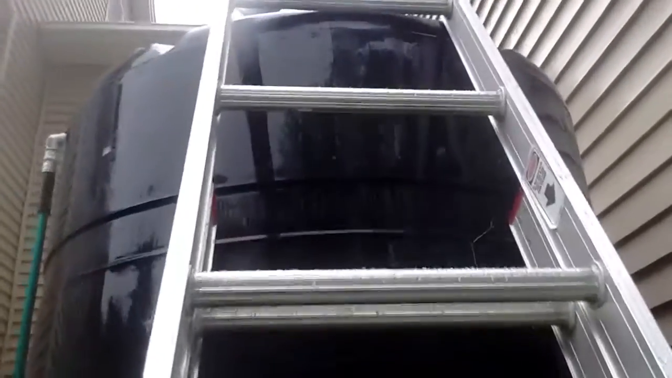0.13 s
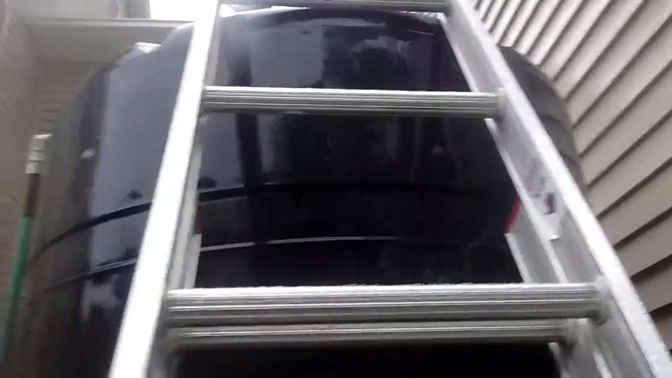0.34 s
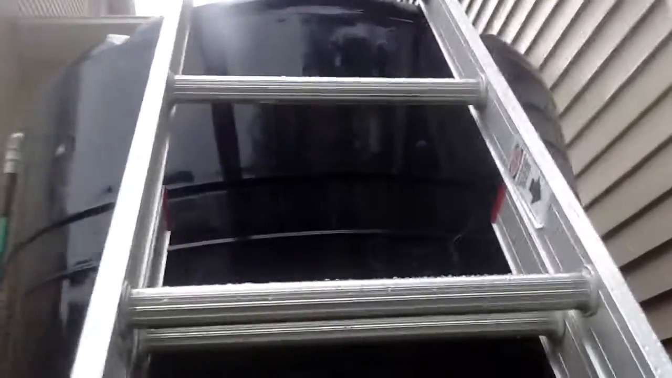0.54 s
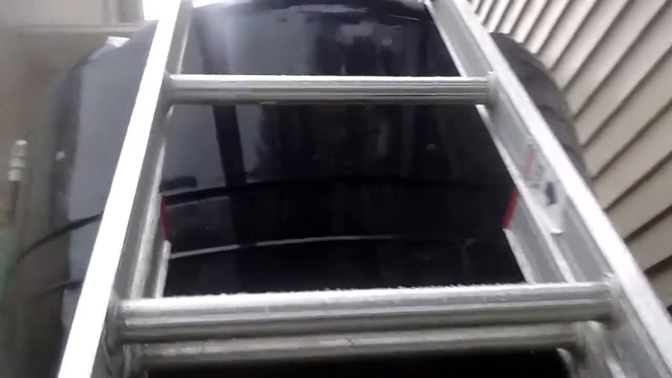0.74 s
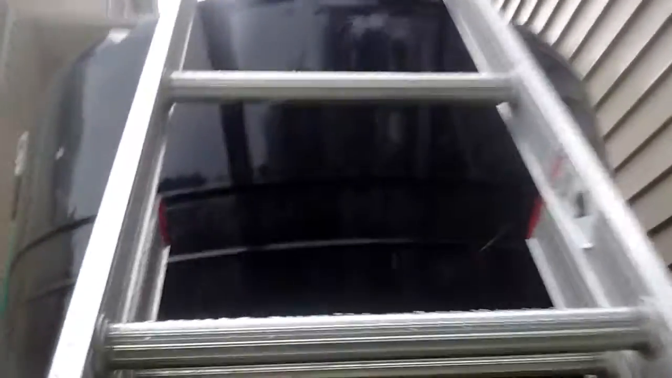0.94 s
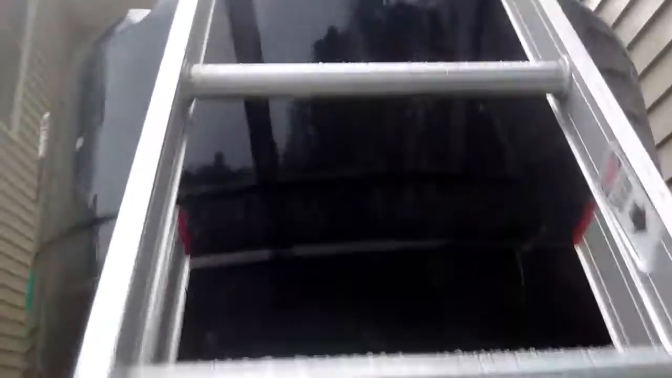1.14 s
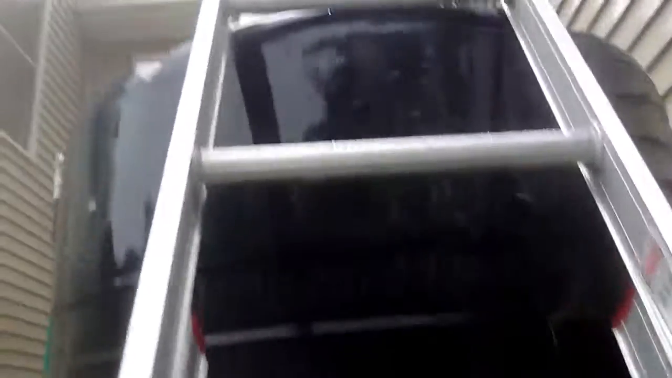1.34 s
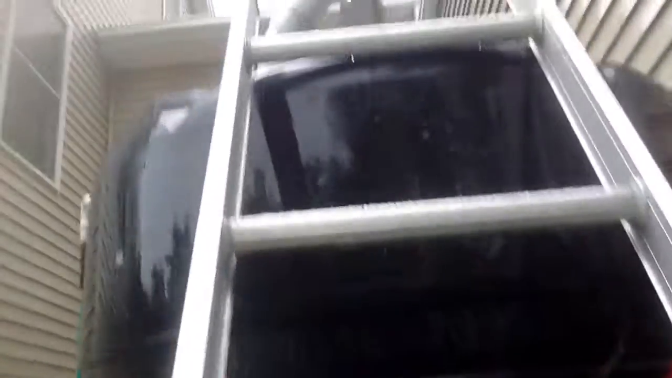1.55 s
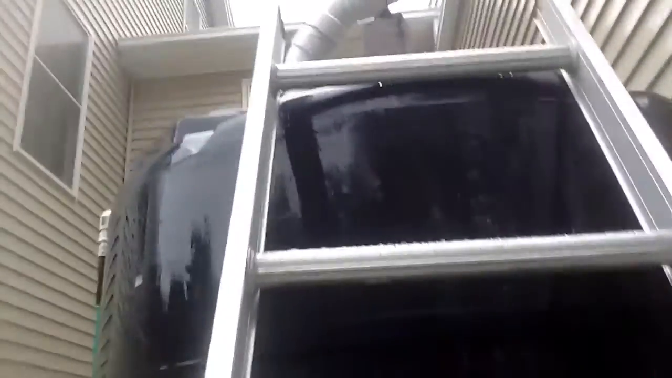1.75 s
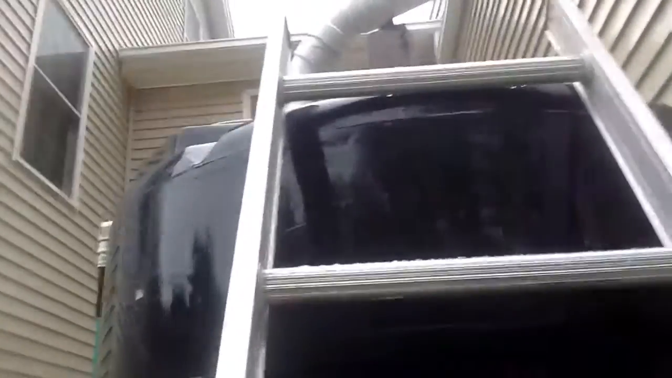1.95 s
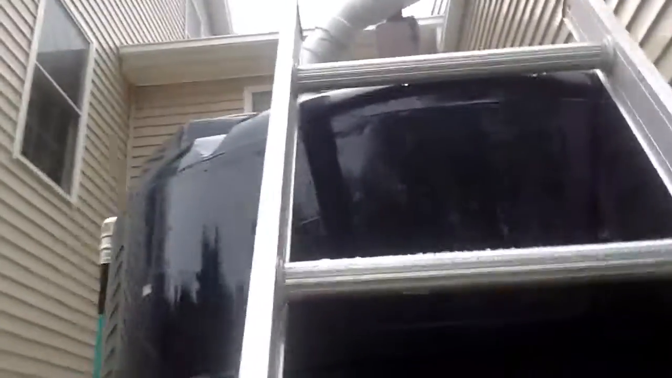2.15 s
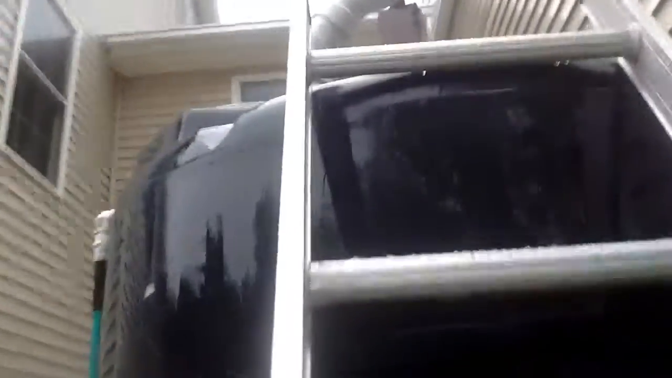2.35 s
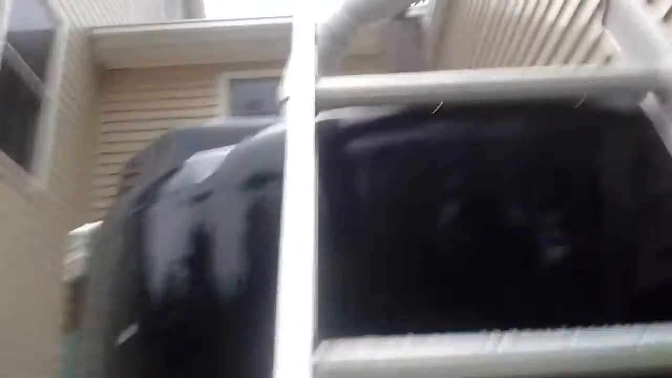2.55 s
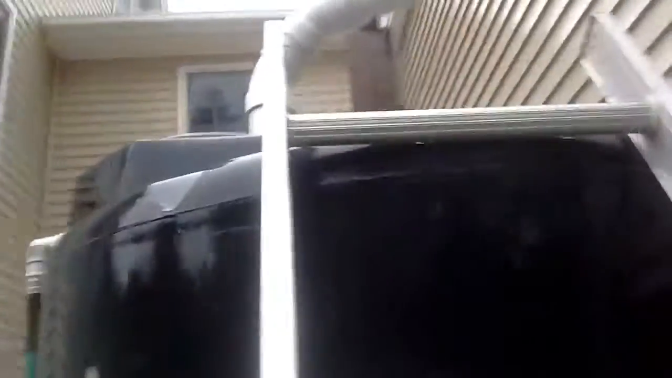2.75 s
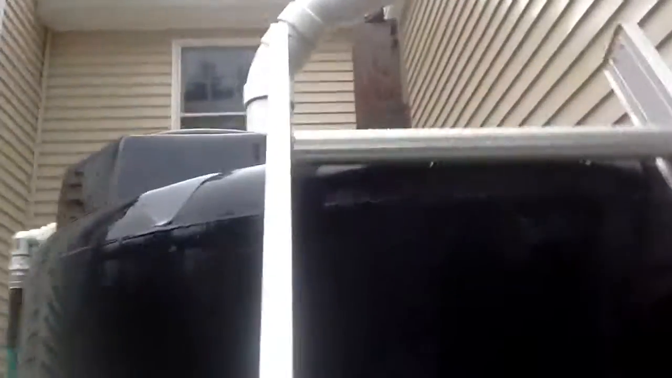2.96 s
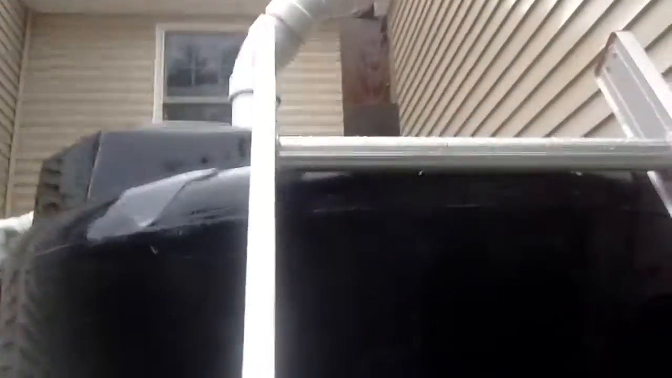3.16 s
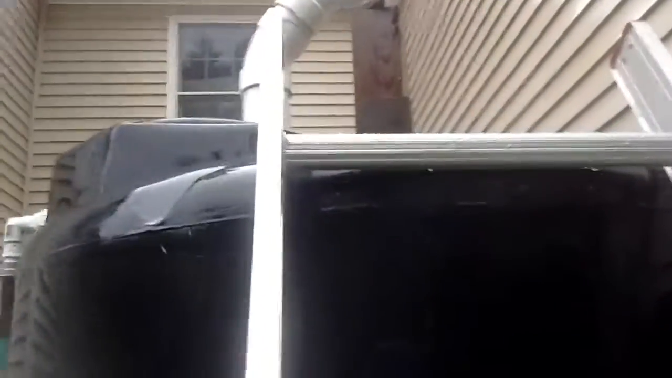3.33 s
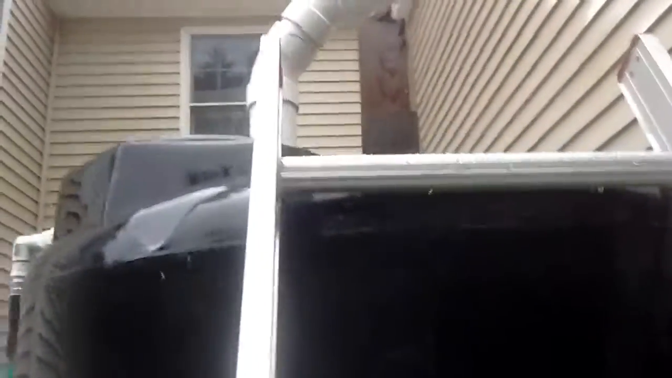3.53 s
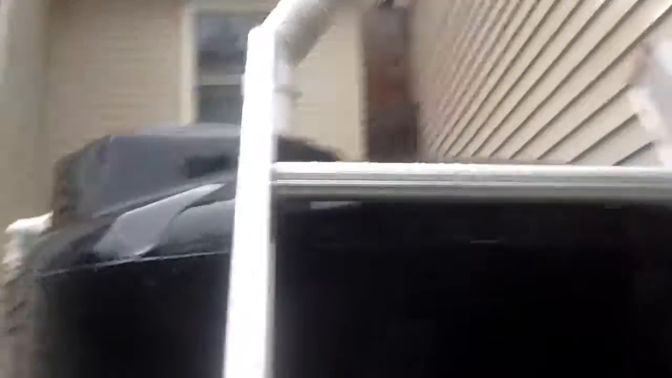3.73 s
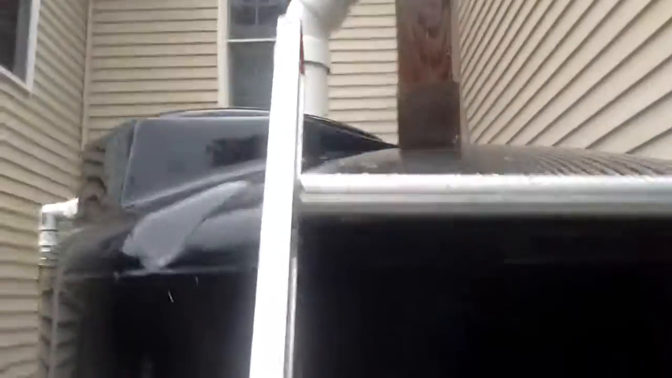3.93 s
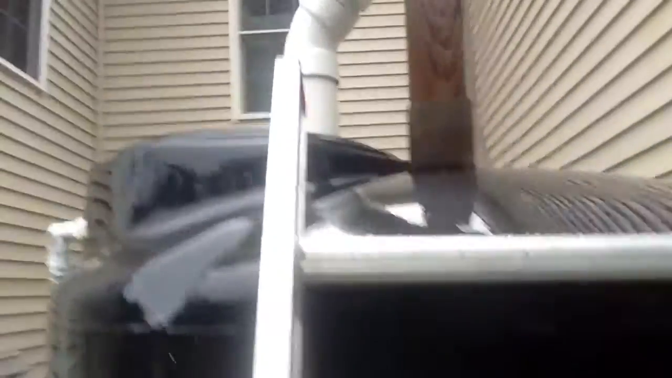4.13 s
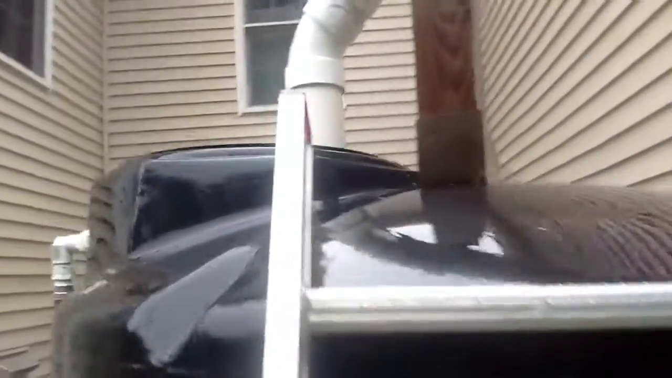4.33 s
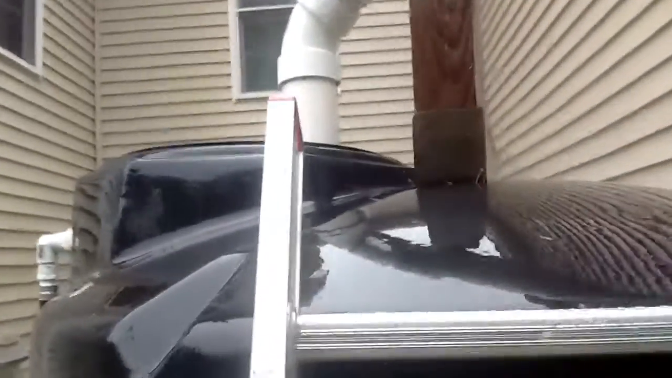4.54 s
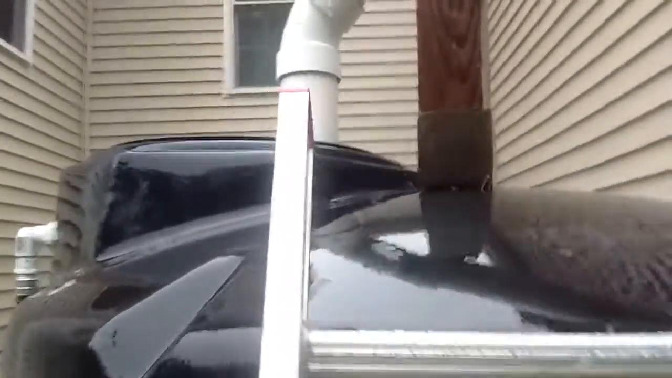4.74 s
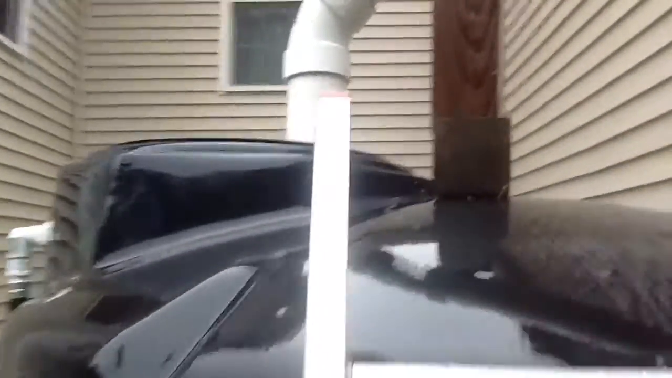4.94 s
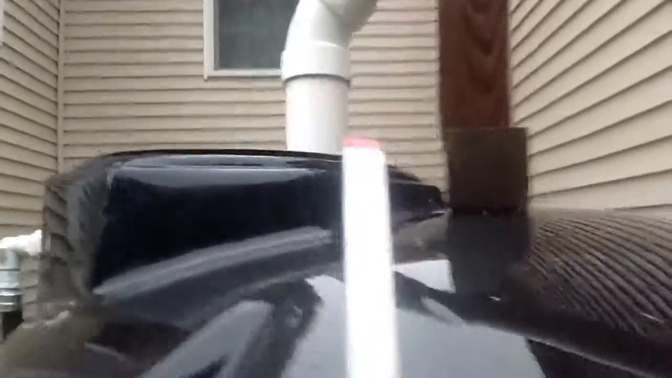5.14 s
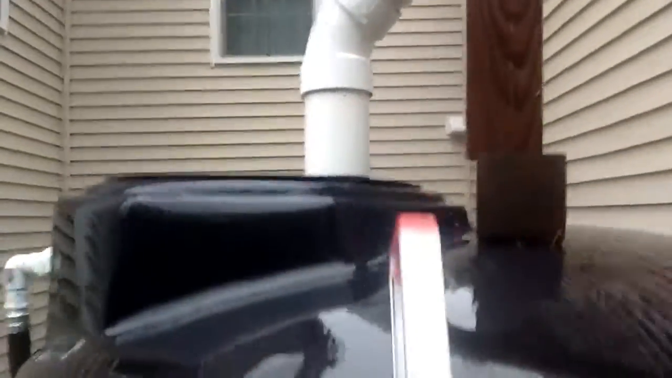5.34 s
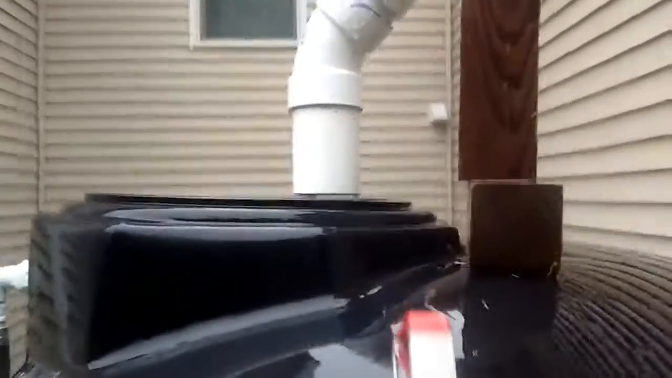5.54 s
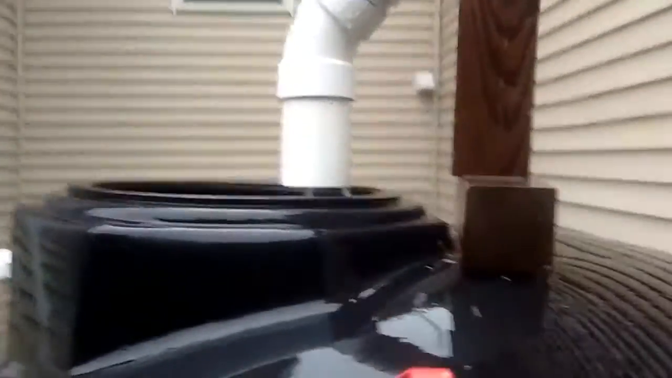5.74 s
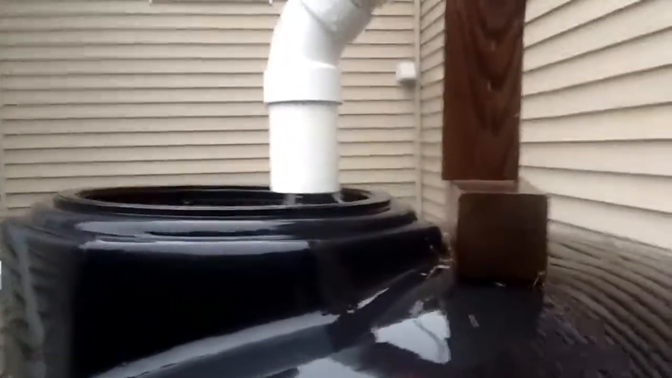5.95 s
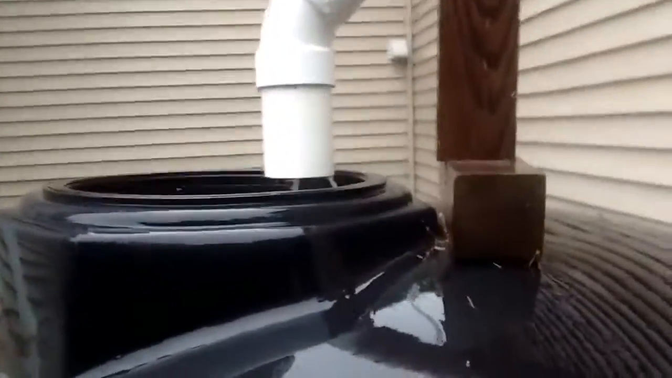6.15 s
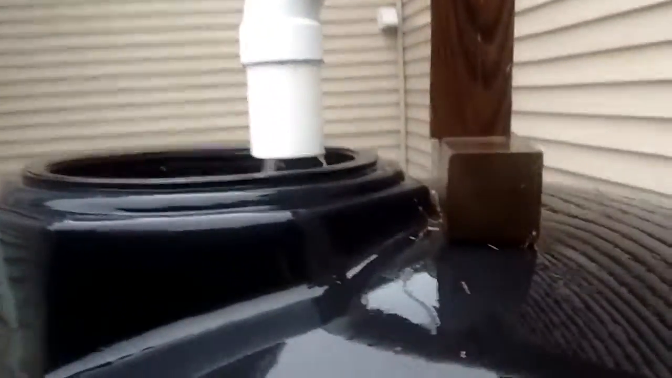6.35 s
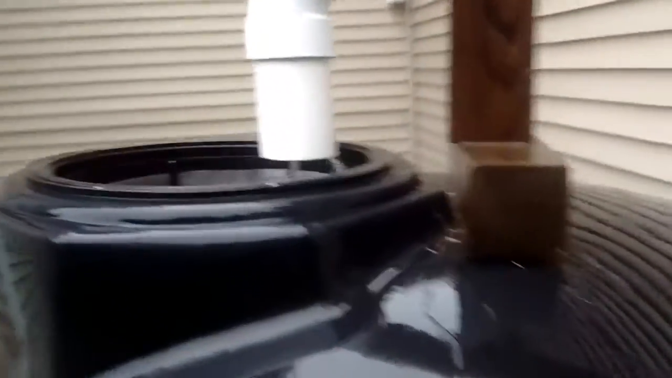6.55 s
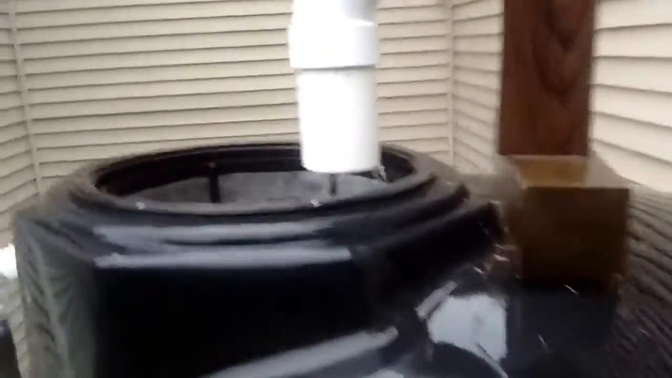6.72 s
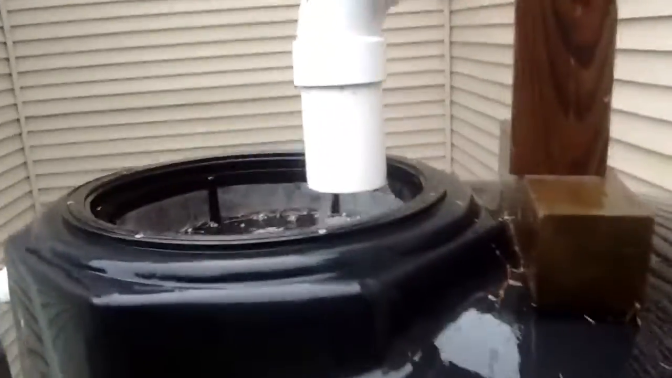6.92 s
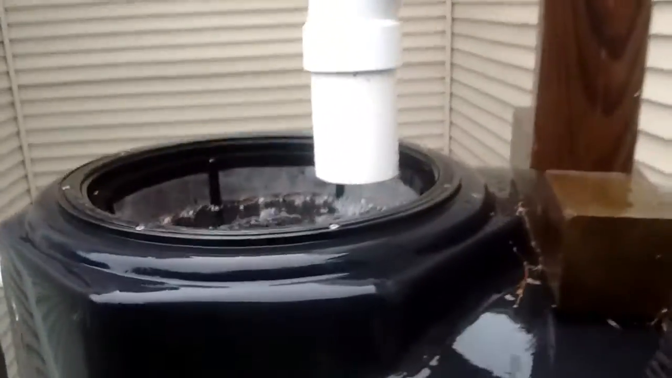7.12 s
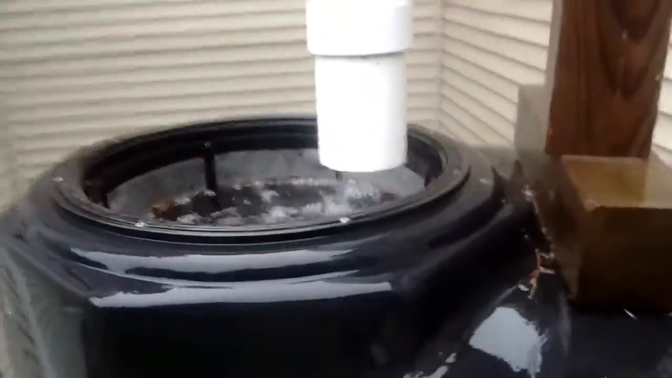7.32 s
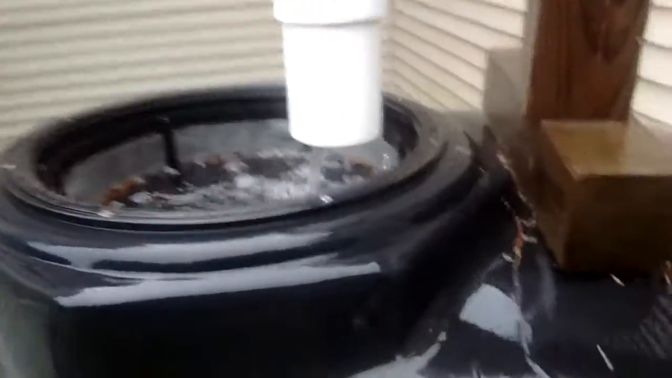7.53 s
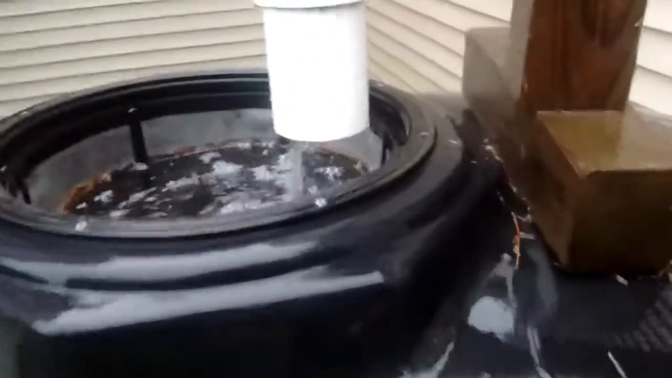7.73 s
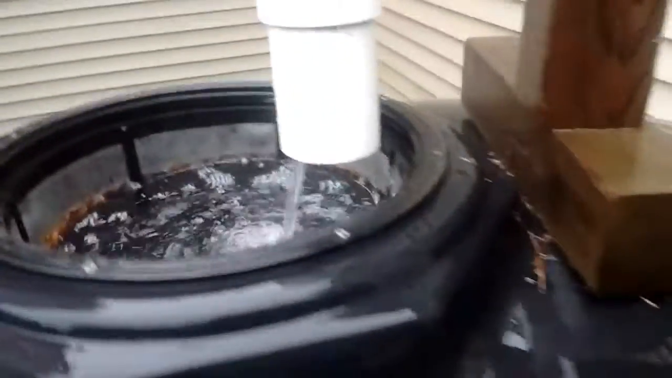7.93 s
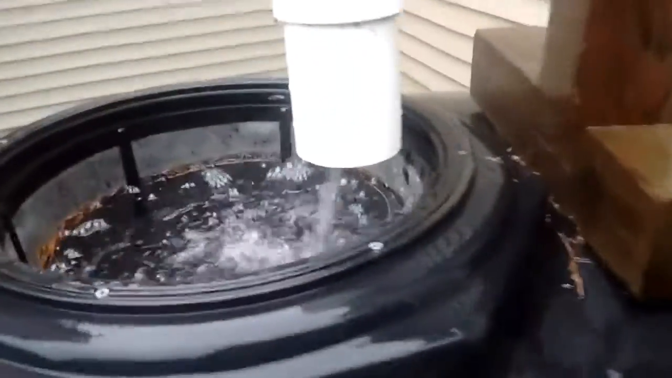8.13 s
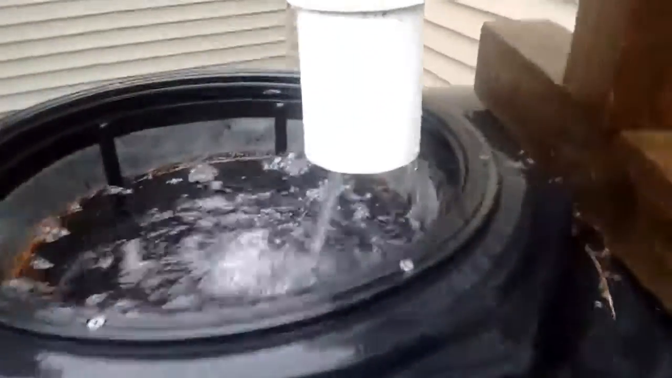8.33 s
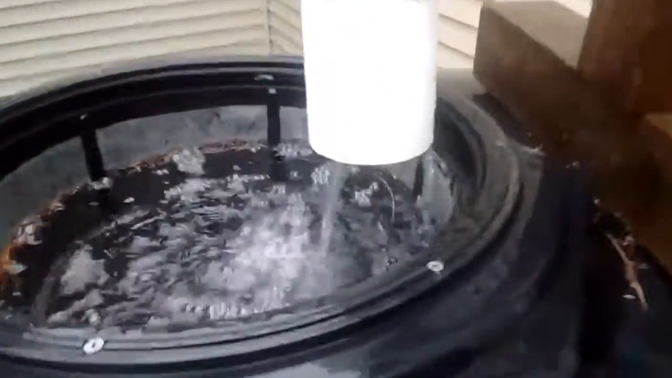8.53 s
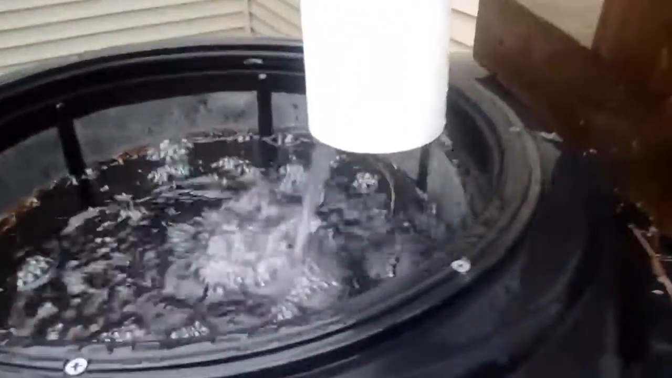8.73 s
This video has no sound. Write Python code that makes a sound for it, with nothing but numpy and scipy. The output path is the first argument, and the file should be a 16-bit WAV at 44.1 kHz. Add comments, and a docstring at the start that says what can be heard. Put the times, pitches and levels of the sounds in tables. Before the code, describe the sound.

Light rain patters with sharp drops ticking close to the microphone, a metal ladder knocks twice, then water pours, splashing and glugging into a full tank.

```python
"""Drops tap on and around the microphone in light rain; a ladder leaning on a big plastic tank knocks twice.
On the climb to the tank's open neck a pouring downpipe takes over, splashing, bubbling and glugging.
Drops are dispersed chirps with ticks, the ladder is ringing modes in noise bursts with low bumps, rain is
shaped noise and random droplets, and the pour is impacts and bubbles through resonances of neck and tank.
Two microphone ports feed a stereo widener and a gain control that ducks at sharp hits and creeps back up."""
import sys
import numpy as np
from scipy import signal
from scipy.fft import rfft, irfft, next_fast_len
from scipy.io import wavfile

SR = 44100
rng = np.random.default_rng(int(sys.argv[2]) if len(sys.argv) > 2 else 0)


def store_pcm(level_fs):
    """Save levels as 16-bit WAV."""
    pcm = np.round(np.clip(level_fs, -1, 1) * 32767).astype(np.int16)
    wavfile.write(sys.argv[1], SR, np.atleast_2d(pcm).T)


N = 391608


def from_db(db):
    """Amplitude factor of a level in dB."""
    return 10 ** (np.asarray(db) / 20)


def rms_one(x):
    """Scale a sound to rms 1, over all its channels together."""
    return x / np.sqrt(np.mean(x ** 2) + 1e-20)


def in_time(rows):
    """A curve of (time, value) points at every sample."""
    s, values = np.transpose(rows)
    return np.interp(np.arange(N) / SR, s, values)


def humps(rows):
    """Brief smooth rises and dips of a level, in dB at every sample."""
    t = np.arange(N) / SR
    return sum(db * np.exp(-((t - s) / half_length) ** 2) for s, db, half_length in rows)


def add(track, s, sound):
    """Mix a short sound into a track at time s."""
    start = max(0, int(s * SR))
    part = track[..., start:start + sound.shape[-1]]
    part += sound[..., :part.shape[-1]]


def delayed(x, size):
    """The same sound, some samples later."""
    return signal.lfilter(np.r_[np.zeros(size), 1], [1], x)


def filtered(x, order, hz, kind):
    """Butterworth filter, "high" or "band"."""
    return signal.sosfilt(signal.butter(order, hz, kind, fs=SR, output="sos"), x)


def drift(rate):
    """Slow random wander with spread 1, made at every 40th sample; rate is in Hz."""
    r = np.exp(-80 * np.pi * rate / SR)
    noise = rng.standard_normal(N // 40 + 2002)
    slow = signal.lfilter([1], [1, -2 * r, r * r], noise)[2000:]
    return np.interp(np.arange(N) / 40, np.arange(len(slow)), rms_one(slow))


def coloured(x, spectrum):
    """Pass a sound through a smooth frequency response given as (Hz, dB) points."""
    size = next_fast_len(N + 2000)
    hz, db = np.transpose(spectrum)
    bins_hz = np.fft.rfftfreq(size, 1 / SR)
    gain = from_db(np.interp(np.log(bins_hz + 1), np.log(hz), db))
    return irfft(rfft(x, size) * gain, size)[..., :N]


def resonance(x, hz, width):
    """Two-pole resonance with gain 1 on top; width is in Hz."""
    r = np.exp(-np.pi * width / SR)
    poles = [1, -2 * r * np.cos(2 * np.pi * hz / SR), r * r]
    return signal.lfilter(np.array([1, 0, -1]) * (1 - r * r) / 2, poles, x)


def ringing(x, modes):
    """A sound together with the resonances that it excites; rms 1."""
    return rms_one(x + sum(from_db(db) * resonance(x, hz, width) for hz, width, db in modes))


def ping(hz, t60, rise=0, swell=1e-4):
    """A dying sine that builds up over `swell` seconds; its pitch climbs by the share `rise` within t60."""
    t = np.arange(int(t60 * SR) + 2) / SR
    envelope = (1 - np.exp(-t / swell)) * np.exp(-np.log(1000) * t / t60)
    return envelope * np.sin(2 * np.pi * hz * t * (1 + rise * t / t60 / 2))


def patter(per_s, spread_db, channels):
    """Random droplet impacts, many small and a few large; rms 1."""
    shape = (channels, N)
    sizes = from_db(spread_db * np.minimum(rng.exponential(1, shape), 5))
    signs = rng.choice([-1, 1], shape)
    return rms_one(sizes * signs * (rng.random(shape) < per_s / SR))


def bubbles(per_s, low_hz, high_hz, cycles, spread_db, rise):
    """Air pockets ring at a pitch set by their size; with a rise they chirp up near the surface; rms 1."""
    out = np.zeros(N)
    for when, size, life, strength in rng.random((int(per_s * N / SR), 4)):
        hz = low_hz * (high_hz / low_hz) ** size
        loudness = from_db(-spread_db * np.log(max(strength, .02)))
        add(out, when * N / SR, loudness * ping(hz, cycles * (.5 + life) / hz, rise))
    return rms_one(out)


def spurts(per_s, length_s, lift_db):
    """Gain of water arriving in lumps: each lump lands quickly and dies away; rms 1."""
    t = np.arange(int(8 * length_s * SR)) / (length_s * SR)
    lumps = np.zeros(N)
    for when, size in rng.random((int(per_s * N / SR), 2)):
        add(lumps, when * N / SR, size * t * np.exp(1 - t))
    return rms_one(from_db(lift_db * np.tanh(lumps)))


def drips(tick_hz, tick_t60):
    """Each drop gives a sharp tick, a short thud and a hollow ring, nearest the right port."""
    # loudest drops close by, and the low thud of the ladder's knock at 1.629 s:
    # start_s, thud_db, pitch_hz, cycles until it has died, tick_db, ring_db
    near_taps = [(.101, -15, 480, 3.3, -30, -38), (0.128, -14.5, 367, 4.9, -27, -38),
                 (0.159, 0, 3150, 4.2, -15, -45), (0.187, -17, 560, 4, -25, -35),
                 (0.216, -4, 2210, 2.6, -22, -47), (.231, -9, 1400, 2.4, -24, -43),
                 (0.2887, 5, 3730, 6.2, 7, -35), (0.4012, 24.5, 1340, 0.61, 8, -11.5),
                 (.407, -8, 790, 5, -25, -28), (0.4967, -1, 950, 1.2, -15.5, -43),
                 (0.666, -8.5, 420, 3, -20.5, -33.5), (1.1785, 0, 467, 1.6, -14, -27),
                 (1.237, 12.5, 2600, 1.25, -19, -32), (1.2449, 4.5, 1100, 1.23, -20, -34),
                 (1.382, -9.5, 900, 1.9, -23.5, -36), (1.5364, 2.5, 900, 1.2, -8, -34),
                 (1.5404, 1.5, 800, 1.3, -12, -38), (1.629, -4, 290, 3.8, -25, -36),
                 (1.679, 2.5, 700, 1.3, -18, -30), (1.8424, 7.5, 500, 1.17, -13, -15),
                 (1.8939, 6.5, 2350, 2.9, -9, -24), (2.283, -11, 510, 4.9, -18, -32),
                 (2.4211, 7.5, 1660, 1.2, -9, -23), (2.456, -6, 900, 1.3, -20, -37),
                 (2.5139, 5.5, 770, 1.76, -8, -28), (2.751, -6, 1060, 1.9, -20, -42),
                 (2.763, -8, 700, 1.5, -23, -42), (2.779, 0, 600, 0.71, -7, -32),
                 (2.84, -6, 1300, 2.1, -16, -33), (2.931, -3, 2620, 2.9, -24, -42),
                 (3.1761, 2, 1770, 1.5, -17, -31), (3.197, -2, 3850, 14, 2, -40),
                 (3.239, -17.5, 520, 6, -24, -45), (3.279, -11, 680, 2.2, -25, -42),
                 (3.4158, -6.5, 796, 2.6, -30, -18), (3.4548, -6.5, 745, 2.1, -26, -17),
                 (3.478, 4.5, 2770, 4.1, 0.5, -40), (3.5564, -15, 1240, 6.3, -4, -18),
                 (3.602, -6.5, 290, 3.3, -15, -38), (3.6428, -7.5, 442, 6.1, -14, -21),
                 (3.6686, -2, 3200, 8.6, 2, -36), (3.7985, 2, 920, 1.03, -22, -24),
                 (3.8709, 3, 1780, 3.9, -21, -28), (4.1035, 2.5, 840, 1.9, 0, -23),
                 (4.202, 5, 3880, 3.3, 3.5, -43), (4.2067, 8.5, 2240, 3.1, -30, -28),
                 (4.4941, 13, 1400, 1.88, -22, -39), (4.571, -10, 890, 4.3, -20.5, -42),
                 (4.593, 3, 1200, 0.86, -20, -29), (4.659, 17, 1116, 0.72, 10, -25),
                 (4.9125, 2.5, 2950, 3.1, -25, -37.5), (4.993, 5.5, 730, 2, -26, -28),
                 (5.011, 15.5, 2870, 2.04, -10, -26), (5.0795, 3, 1500, 0.94, -24.5, -34),
                 (5.139, 8, 1670, 1.37, -22, -37), (5.169, -9, 1650, 4, -6, -44),
                 (6.078, -2, 1650, 8, -23, -35.5), (6.0803, -9, 1100, 9.8, -28, -33),
                 (6.205, -4.5, 2480, 5.5, -24, -42), (6.2378, -9, 476, 9, -16, -26),
                 (6.492, 6.5, 1200, 0.99, -22, -34), (6.6924, 2.5, 674, 0.81, -26, -41),
                 (6.8246, 3, 3180, 6.6, -30, -38), (7.569, -3.5, 3900, 23, -8, -42),
                 (7.583, -3, 1300, 2.8, -22, -38), (7.7192, 7, 890, 0.94, -11, -24),
                 (7.9846, 0.5, 1140, 9.2, -15, -27), (8.106, -14.5, 830, 12, -24, -45),
                 (8.5492, 9, 1100, 1.2, -2.5, -22)]
    # hollow ring under a drop: ring_hz, level_db relative to the drop's ring, t60_s
    hollow_body = [(470, 0, 0.036), (1250, -5, 0.016)]
    out = np.zeros(N)
    dull = np.exp(-2 * np.pi * tick_hz / SR)
    impact = (1 - dull) * dull ** np.arange(20)
    for s, db, hz, cycles, tick_db, ring_db in near_taps + small_drips():
        # a small patch of surface radiates little below its own pitch
        thud = filtered(np.pad(ping(hz, cycles / hz), (0, 500)), 1, hz / 5, "high")
        add(out, s, -from_db(db) * thud)
        for body_hz, body_db, body_t60 in hollow_body:
            add(out, s, -from_db(ring_db + body_db) * ping(body_hz, body_t60))
        add(out, s, -from_db(tick_db) * impact)
        add(out, s, -from_db(tick_db - 8.0) * ping(tick_hz, tick_t60))
    return dispersed(out, order=5) * from_db([[-23], [0]])


def small_drips():
    """Fainter drops with the columns of the near taps, scattered in time, strength and pitch."""
    per_s, low_hz, high_hz, cycles = 16, 507, 3050, 1.56
    thud_db, tick_db, ring_db, spread_db = -15, -17, -46, 7
    rows = []
    for when, strength, size in rng.random((int(per_s * N / SR), 3)):
        hz = low_hz * (high_hz / low_hz) ** size
        db = spread_db * (strength - .5)
        rows.append((when * N / SR, thud_db + db, hz, cycles, tick_db + db, ring_db + db))
    return rows


def dispersed(x, order):
    """Bending waves carry the highs fastest, so a tap arrives as a short falling chirp with little bass."""
    lag_below_hz, bass_cut_hz = 845, 108
    k = np.exp(-2 * np.pi * lag_below_hz / SR)
    for stage in range(order):
        x = signal.lfilter([-k, 1], [1, -k], x + 1e-18)  # the tiny offset avoids slow denormal numbers
    return filtered(x, 2, bass_cut_hz, "high")


def splats(t60, low_hz):
    """The nearest drops burst into spray, each a short bright puff of noise."""
    # bursts close to the microphone: start_s, level_db
    near_bursts = [(2.737, -26), (3.307, -24.5), (3.72, -24), (5.036, -26), (5.327, -25), (5.373, -25),
                   (5.845, -20.5), (6.344, -29), (6.545, -23), (7.281, -21), (7.463, -20.5)]
    out, t = np.zeros((2, N)), np.arange(SR // 20) / SR
    for s, db in near_bursts:
        add(out, s, from_db(db - 60 * t / t60) * rng.standard_normal((2, len(t))))
    return filtered(out + 1e-18, 2, [low_hz, 2 * low_hz], "band")


def spatter(per_s, t60, low_hz):
    """Drops burst into fine spray close by: brief puffs of very high hiss; rms 1."""
    dying = from_db(-60 / (t60 * SR))
    hits = np.abs(patter(per_s, spread_db=10.0, channels=1))
    puffs = signal.lfilter([1], [1, -dying], hits + 1e-18)
    return rms_one(filtered(puffs * rng.standard_normal((2, N)), 2, low_hz, "high"))


def ladder():
    """Aluminium rails knock and chatter: a short dense clatter, out of which a few clear modes ring on."""
    # the ladder shifting against the tank: start_s, level_db
    knocks = [(.781, -42), (0.8126, -17), (.941, -35.5), (1.555, -28.5), (1.5644, -14.5), (1.605, -33),
              (1.630, -27.5)]
    # clear modes of the rails: pitch_hz, level_db, t60_s
    rail_modes = [(578, -13, .42), (602, -14, .3), (1063, -5, .3), (1100, -7, .24), (1136, -4, .27),
                  (1160, -8, .36), (1290, 2, .19), (1685, -8, .28), (790, -4, .14), (1895, -7, .2),
                  (2175, -3, .13), (2230, -5, .21), (2455, -6, .2), (2718, -6, .16), (3390, -7, .13),
                  (3844, -7, .18), (4194, -3, .12), (4660, -9, .14), (5090, -8, 0.11)]
    # dense clatter in bands: low_hz, high_hz, level_db, t60_s
    clatter_bands = [(607, 1840, 3, 0.19), (1380, 2600, -1.5, 0.2), (100, 420, -22, 0.093),
                     (2640, 4560, 2, 0.2), (6000, 9380, 8.5, 0.06), (10800, 13500, -9.5, 0.064)]
    touch_s, touch_loss_db = .008, 5  # mean time between touches, and how much weaker each one is
    out, t = np.zeros((2, N)), np.arange(SR // 2) / SR
    for s, knock_db in knocks:
        for hz, db, t60 in rail_modes:
            strengths = from_db(knock_db + db + rng.normal(0, 1, (2, 1)))
            add(out, s, strengths * ping(hz, t60) * rng.choice([-1, 1]))
    for s, knock_db in knocks:
        for k in range(4):
            touch_at = s + touch_s * k * rng.uniform(.8, 1.2)
            touch_db = knock_db - touch_loss_db * k
            for low, high, db, t60 in clatter_bands:
                noise = rms_one(filtered(rng.standard_normal((2, len(t))), 3, [low, high], "band"))
                decay = np.exp(-np.log(1000) * t / t60)
                add(out, touch_at, from_db(touch_db + db) * noise * decay)
    return out


def pouring():
    """The stream breaks on the water in uneven spurts: spray, froth and small bubbles, ringing in the neck."""
    # colour of the spray: frequency_hz, level_db
    spray_colour = [(200, -39), (450, -28), (800, -26), (1300, -26), (2200, -25), (3000, 19.5), (4200, 8.5),
                    (6200, 1.5), (8000, 6.5), (10500, 0.5), (14500, -12.5)]
    # air resonances of the tank's neck: pitch_hz, width_hz, level_db
    neck_modes = [(1434, 15, -0.5), (2027, 82, -1), (2340, 66, 7.5)]
    spray = rms_one(coloured(patter(per_s=9000, spread_db=4.5, channels=3), spray_colour))
    froth = np.array([bubbles(per_s=600, low_hz=1115, high_hz=7760, cycles=11.5, spread_db=-1.0, rise=0)
                      for path in range(3)])
    fizz = np.array([bubbles(per_s=230, low_hz=1200, high_hz=5600, cycles=44, spread_db=3.3, rise=.1)
                     for path in range(3)])
    splashes = (spray + from_db(-3) * froth) * spurts(per_s=26, length_s=.005, lift_db=8)
    clusters = fizz * spurts(per_s=20, length_s=.012, lift_db=5)
    water = ringing(splashes + from_db(-3.5) * clusters, neck_modes)
    # the straight path reaches the right port two samples before the left;
    # separate random water at each port stands for echoes off the house walls
    straight, echoes = water[0], water[1:]
    return from_db(-6) * np.array([delayed(straight, 2), straight]) + from_db(3.5) * echoes


def plops():
    """Single large bubbles pinch off and ring, rising a little; the left port hears them best."""
    # clearest bubbles under the stream: start_s, level_db, pitch_hz
    clear_bubbles = [(4.37, -22, 1400), (5.495, -18.5, 1400), (6.636, -12, 2300), (6.676, -12, 2300),
                     (6.755, -10, 2120), (7.359, -23, 1100), (7.391, -13, 2360), (7.5, -14, 2310),
                     (7.5372, -6.5, 2020), (7.848, -20, 1420), (7.865, -15, 2150), (7.897, -16, 1830),
                     (7.943, -12, 2400), (7.9687, -16, 1640), (8.031, -12, 2470), (8.072, -6.5, 2910),
                     (8.172, -29, 1450), (8.2375, -11.5, 4570), (8.291, -22, 2000), (8.3117, -12, 2070),
                     (8.352, -7.5, 4280), (8.364, -16, 2450), (8.43, -16, 2200), (8.452, -16, 2150),
                     (8.6122, -3, 2134), (8.6185, -1, 2980), (8.6377, -10, 1450), (8.71, -13, 2030),
                     (8.7564, -13, 1900), (8.8322, -14, 1350), (8.859, -11, 1440)]
    out = np.zeros(N)
    for s, db, hz in clear_bubbles:
        add(out, s, from_db(db) * ping(hz, 37.4 / hz, rise=0.1, swell=0.00098))  # dies in 37.4 cycles
    return out * from_db([[0], [-14]])


def glugs(right_db):
    """The largest air pockets, low and round, pushing the two ports in opposite directions."""
    # air pockets inside the tank: start_s, level_db, pitch_hz
    air_pockets = [(5.776, -22, 427), (5.98, -13, 430), (6.004, -19, 205), (6.15, -19, 195),
                   (6.534, -16, 325), (6.685, -24, 397), (7.062, -11, 385), (7.166, -13, 410),
                   (7.304, -22, 169), (7.493, -16, 360), (7.55, -16, 355), (7.566, -13, 228),
                   (7.724, -13, 420), (7.787, -9, 410), (8.035, -22.5, 397), (8.295, -19, 385),
                   (8.44, -18, 210), (8.729, -16, 222), (8.775, -11, 325), (8.83, -19, 212)]
    out = np.zeros(N)
    for s, db, hz in air_pockets:
        add(out, s, from_db(db) * ping(hz, 22 / hz, rise=.15, swell=.003))  # dies in 22 cycles
    return np.array([out, -from_db(right_db) * out])


def churning():
    """The plunging stream drags down air that gurgles and makes the tank boom; the rumble sounds very wide."""
    # colour of the rumble: frequency_hz, level_db
    rumble_colour = [(25, -11), (55, 10.5), (90, 5.5), (135, 3), (230, -8.5), (320, -3), (450, -2),
                     (700, -0.5), (1400, -19.5), (5000, -68)]
    # boom of the tank's air and walls: pitch_hz, width_hz, level_db
    tank_modes = [(182, 22, -3), (228, 30, 0), (370, 120, -7)]
    rumble = rms_one(coloured(rng.standard_normal((3, N)), rumble_colour)) * from_db(3 * drift(14))
    gurgle = np.array([bubbles(per_s=55, low_hz=173.5, high_hz=560, cycles=20, spread_db=3.2, rise=.15)
                       for path in range(3)])
    low = ringing(rumble + from_db(-1) * gurgle, tank_modes)
    # above the deepest bass most of it moves the two ports in opposite directions, a little is each port's own
    opposed = filtered(low[0], 2, 110, "high") * np.array([[1], [-1]])
    return from_db(-4) * opposed + from_db(-11.5) * low[1:]


def rain():
    """A wash of far drops on leaves and roofs; nearer ones crackle and tick, each at a pitch of its own."""
    # colour of the rain: frequency_hz, level_db
    rain_colour = [(200, 6), (450, -0.5), (800, 7.5), (1300, 8), (2200, 6.5), (3000, 12), (4200, 5),
                   (6200, 1), (8200, 2), (9500, 3), (10300, -2.5), (11500, -11), (14500, -11)]
    wash = rng.standard_normal((2, N)) + from_db(-2) * patter(per_s=900, spread_db=4.4, channels=2)
    plips = np.array([bubbles(per_s=260, low_hz=1700, high_hz=15000, cycles=8, spread_db=4.2, rise=0)
                      for port in range(2)])
    flutter = from_db(1.1 * drift(20))
    return rms_one(coloured(wash + from_db(-10.5) * plips, rain_colour)) * flutter


def scene():
    """The sound at the left and right ports, from even rain on the ground up to the stream in the neck."""
    # loudness of the water, rain and then the uneven stream, before trims: time_s, level_db
    water_level = [(0, -31.5), (2.5, -31), (3.15, -30.5), (3.7, -30), (5.8, -31), (6.35, -27.5), (6.8, -31),
                   (7.1, -31), (7.5, -27), (8.2, -31), (8.6, -24.5), (8.85, -20.5)]
    # climbing towards the open neck: time_s, share of the rain-and-stream power that is stream (0-1)
    nearness = [(0, 0.15), (4.0, 0.12), (5.3, 0.21), (6.3, 0.18), (7.2, 0.92), (8.8, 0.79)]
    # low churning, strongest near 5.9 s relative to the water, then easing: time_s, offset_db
    churn_offset = [(0, -1), (2.4, -1.5), (4.2, -0.5), (5.3, 1.5), (5.9, 3.5), (6.8, 1.5), (7.4, 2),
                    (8.2, 0), (8.8, 1)]
    # low bumps and swells: the ladder knocking the tank, a brief rub, the stream churning:
    # centre_s, change_db, half_length_s
    bumps_and_swells = [(.85, 6, 0.075), (1.565, 16.5, 0.028), (2.33, 8.5, 0.054), (6.285, 5.5, 0.0095),
                        (6.3, 3.5, 0.15), (7.55, 3.5, 0.041)]
    # the stream gushes or thins for a moment: centre_s, change_db, half_length_s
    surges = [(6.22, 3, .02), (6.48, 2, 0.018), (7.555, 2.5, 0.015), (7.68, -4.5, 0.02), (8.27, -4, .02),
              (8.335, 4.5, 0.022), (8.43, 2.5, 0.011), (8.59, -0.5, .02), (8.86, 1.5, .025)]
    water_db = in_time(water_level)
    near = np.clip(in_time(nearness), 0, 1)
    spray = from_db(-21.5 + 6 * near) * spatter(per_s=40, t60=.014, low_hz=6000)
    low_db = water_db + in_time(churn_offset) + humps(bumps_and_swells)
    stream = from_db(humps(surges) - 1) * pouring()
    wet = from_db(water_db - 3.5) * (np.sqrt(1 - near) * rain() + np.sqrt(near) * stream + spray)
    tank = from_db(low_db) * churning() + glugs(right_db=-5.5) + plops()
    drops = drips(tick_hz=9920, tick_t60=0.0015) + splats(t60=0.067, low_hz=5300)
    return wet + tank + drops + from_db(-2.0) * ladder()


def gain_control(x):
    """Treble peaks push the gain down within milliseconds, by their excess; it climbs back steadily."""
    threshold_db, detector_hz, attack_s = -13, 3020, 0.0074
    release_db_per_s, start_duck_db = 10, 3  # it starts out partly ducked
    treble = filtered(x, 2, detector_hz, "high")
    over_db = 20 * np.log10(np.abs(treble).max(axis=0) + 1e-9) - threshold_db
    climb = release_db_per_s * np.arange(N) / SR
    # adding the climb turns a steady release into a running maximum
    held = np.maximum.accumulate(np.maximum(over_db + climb, start_duck_db))
    duck_db = np.maximum(held - climb, 0)
    r = np.exp(-1 / (attack_s * SR))
    smooth_db = signal.lfilter([1 - r], [1, -r], duck_db, zi=[r * start_duck_db])[0]
    return x * from_db(-smooth_db)


def record(dry):
    """The widener subtracts a late, dulled copy of the other side; after gain control, peaks clip."""
    # channel balance, the left being brighter: frequency_hz, left_minus_right_db
    balance = [(500, 0), (1100, -.5), (2300, 3), (4200, 1.5), (8000, 0), (10500, 3), (13000, 8)]
    dulled = signal.fftconvolve(dry[::-1], signal.firwin(9, 11500, fs=SR)[None], "same", axes=1)
    wide = dry - .87 * delayed(dulled, 14)
    left = coloured(wide[0], [(hz, db / 2) for hz, db in balance])
    right = coloured(wide[1], [(hz, -db / 2) for hz, db in balance])
    clipped = np.clip(gain_control(np.array([left, right])), -1, 1)
    # steep treble limit at 15.7 kHz
    return signal.sosfilt(signal.ellip(10, .2, 80, 15700, fs=SR, output="sos"), clipped)


dry = scene()
out = record(dry)
store_pcm(out)
```